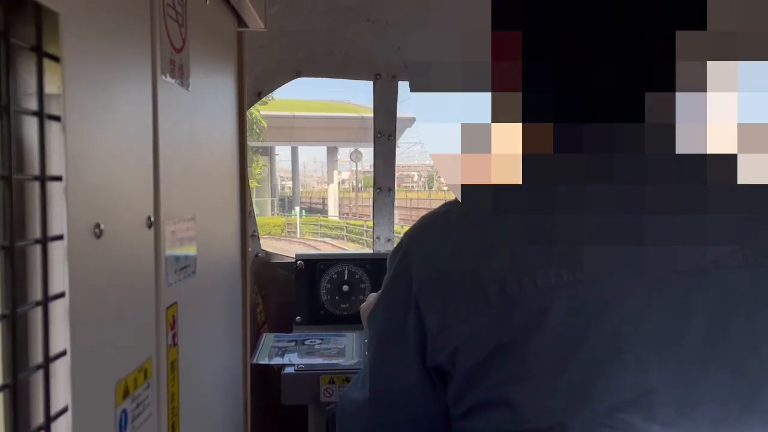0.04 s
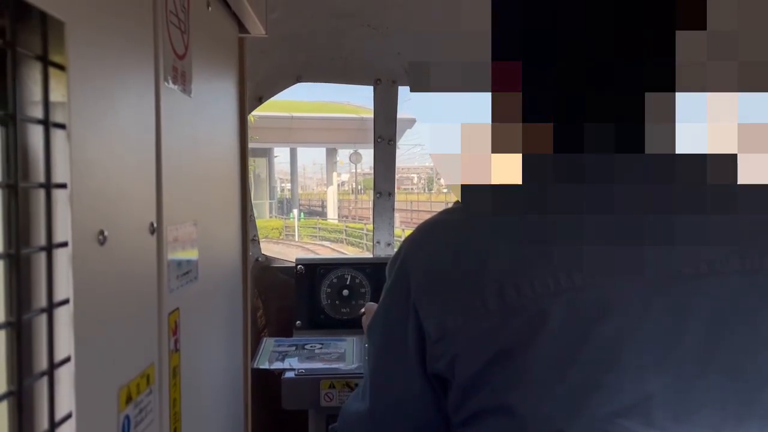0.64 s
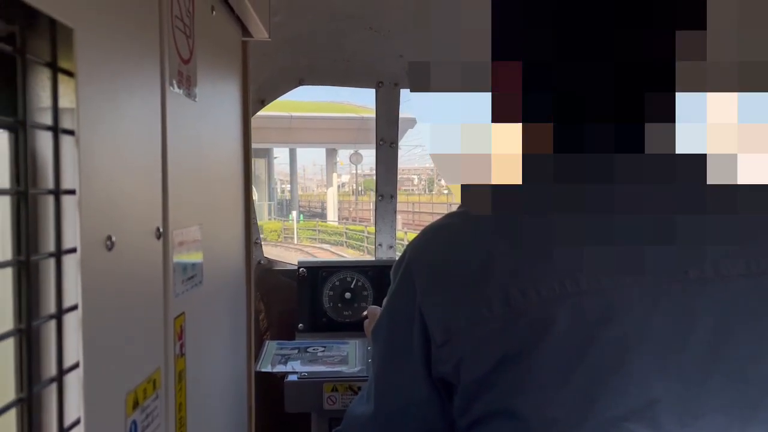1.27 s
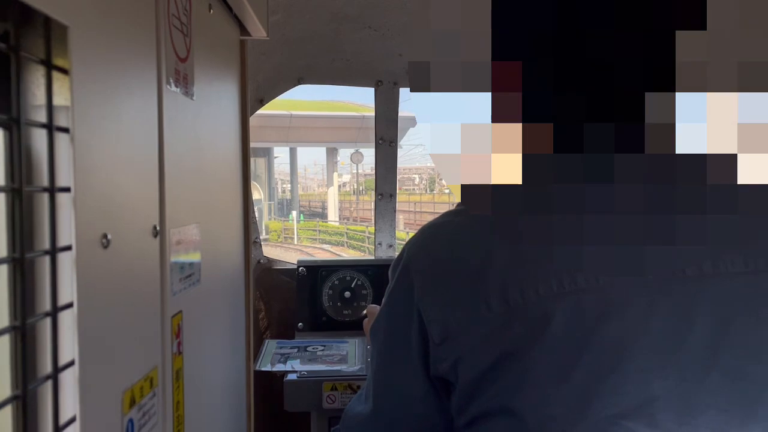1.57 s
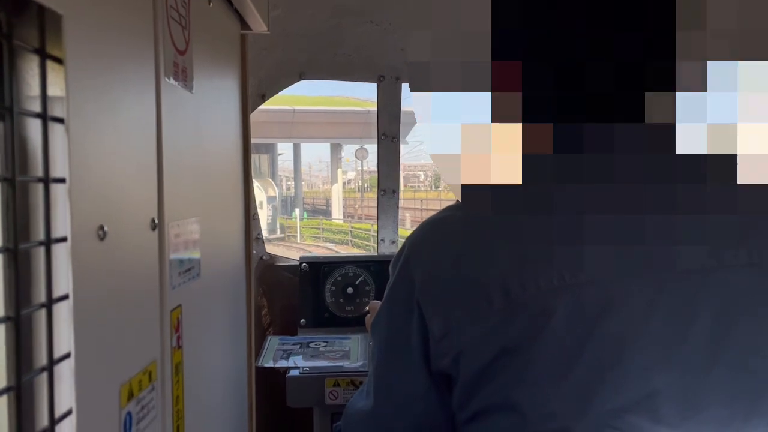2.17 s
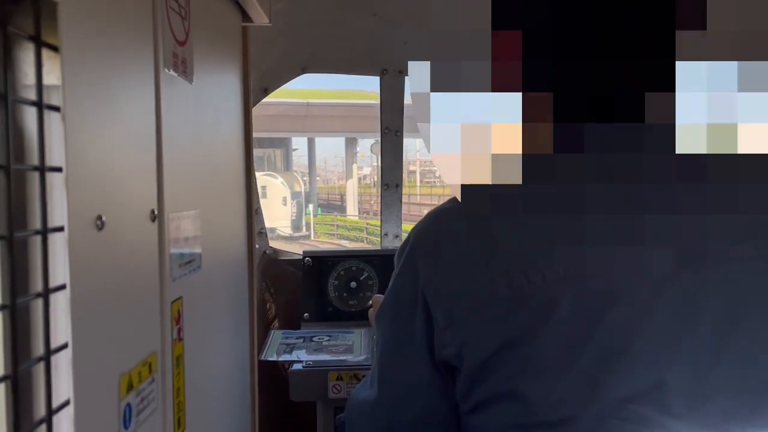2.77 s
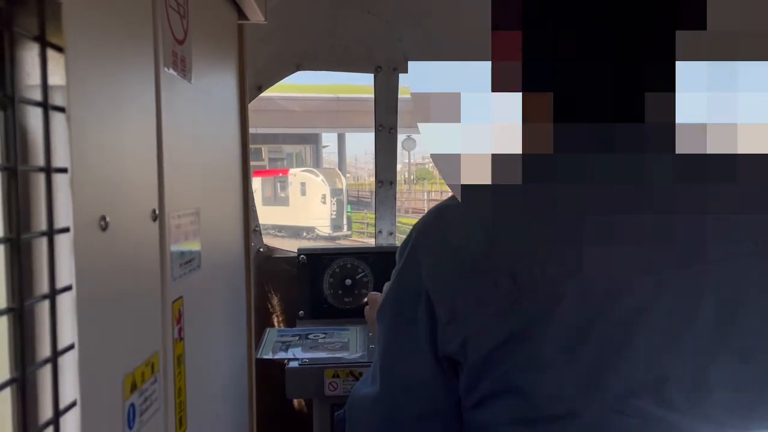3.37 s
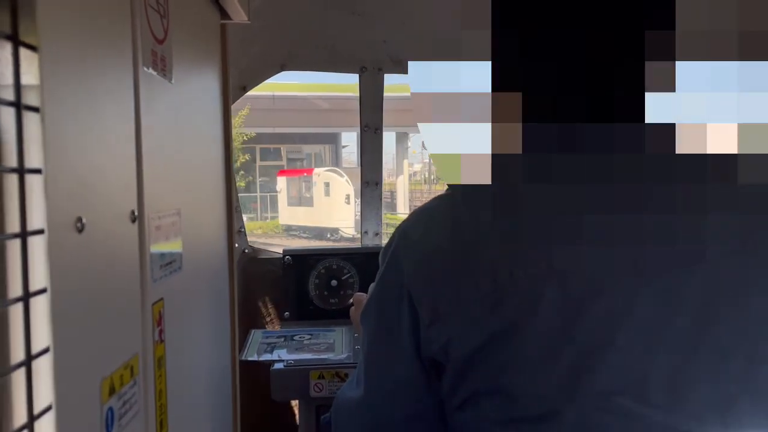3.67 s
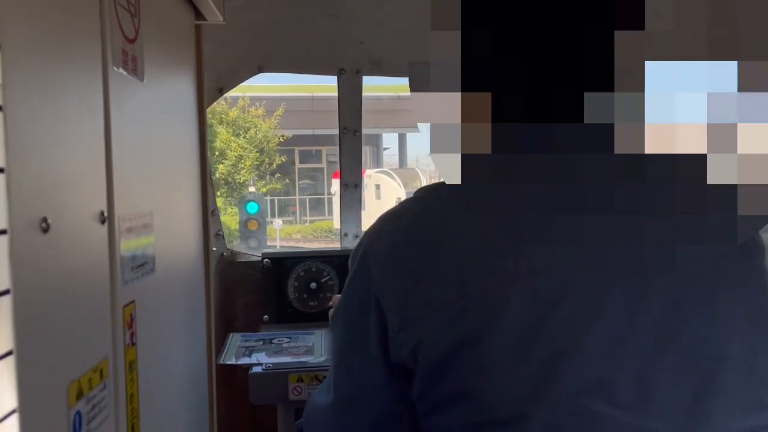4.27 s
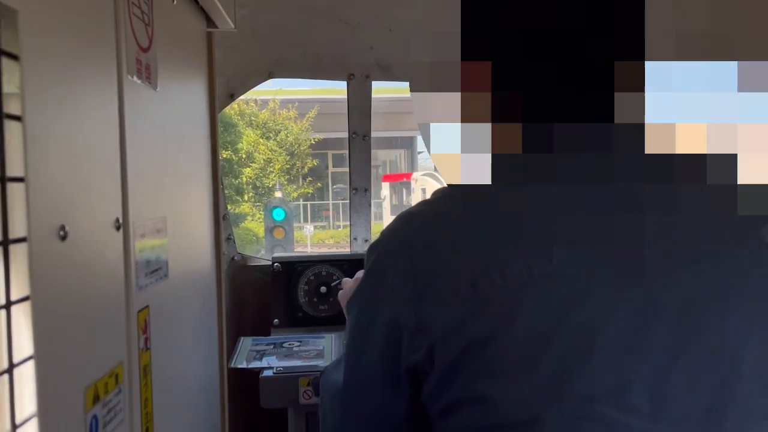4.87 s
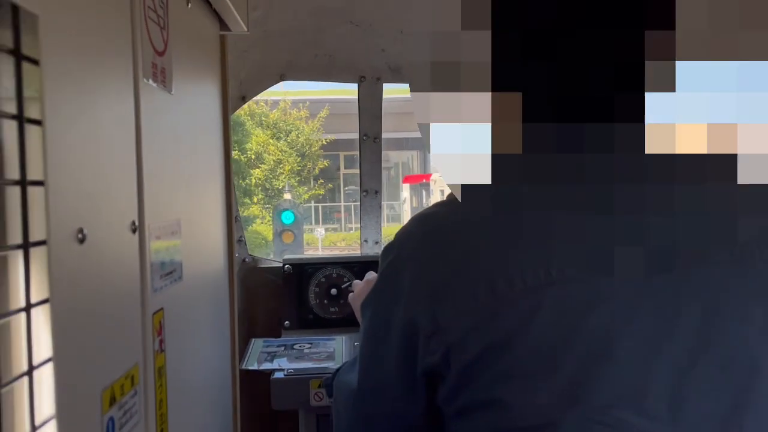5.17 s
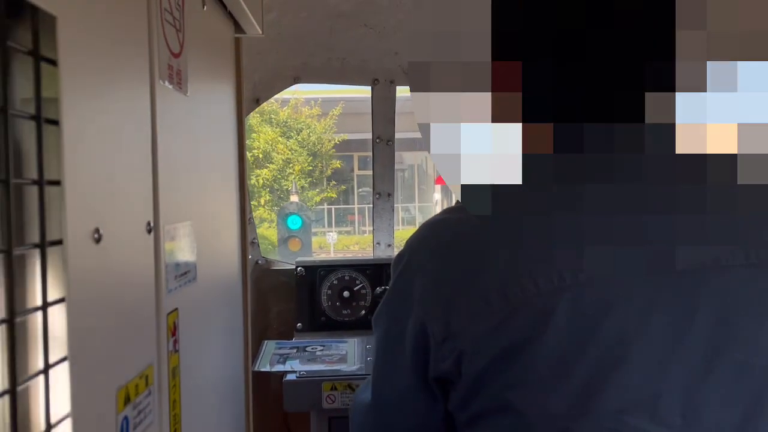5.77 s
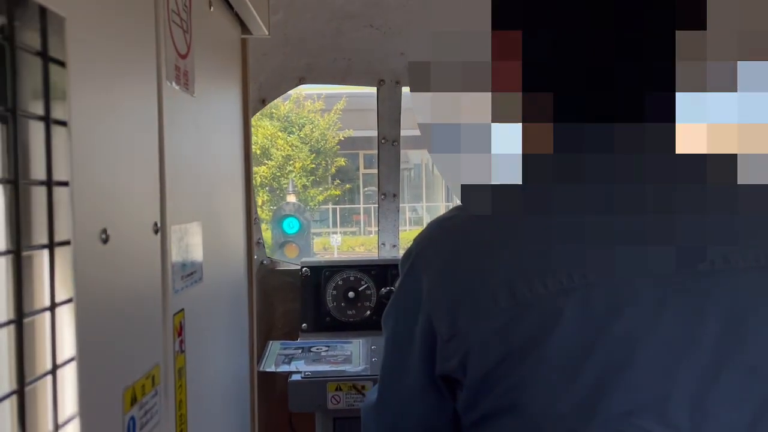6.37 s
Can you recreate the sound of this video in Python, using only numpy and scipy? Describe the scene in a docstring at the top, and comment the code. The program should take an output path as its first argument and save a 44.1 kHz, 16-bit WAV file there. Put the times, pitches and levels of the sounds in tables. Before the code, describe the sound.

Heard from within the cab of a small ride-on train, a low rumble gathers a little strength and keeps going, with rolling wheel noise and a faint steely ringing. Dull thumps and muffled rail joint clacks arrive irregularly, thickest in the middle, along with a few short wheel squeaks and ticks from loose fittings. The ride then smooths out, with one more clack and thump near the end.

```python
"""The cab of a small ride-on train booms as it rolls along its outdoor track, heard from inside.
The rails force the cab into vibration, rough treads make the wheels roar, and friction makes them sing.
Impacts at rail joints clack, jolts thump through the suspension and leave the panels shuddering.
Flanges give a few short squeaks and loose fittings tick, over a thin hiss and a faint gear whine."""
import sys
import numpy as np
from scipy import signal
from scipy.fft import rfft, irfft
from scipy.io import wavfile
from scipy.ndimage import uniform_filter1d

SR = 44100
rng = np.random.default_rng(int(sys.argv[2]) if len(sys.argv) > 2 else 0)


def dump(signal):
    """Clip the signal to [-1, 1] and save it as 16-bit WAV at the path in sys.argv[1]."""
    limited = np.clip(np.atleast_2d(signal).T, -1, 1)
    pcm = np.round(limited * 32767).astype(np.int16)
    wavfile.write(sys.argv[1], SR, pcm)


N = 283563
T, HZ = np.arange(N) / SR, np.fft.rfftfreq(N, 1 / SR)

# The train gathers way, then runs evenly. Each row: time in seconds, rolling effort in dB.
EFFORT = [(0, -6), (.45, -3), (1.0, -1.5), (1.8, -1), (2.5, 0), (3.0, -0.5), (3.45, -1.5), (4.1, 0.5),
          (4.55, -1.5), (5.4, -0.5), (6.43, -1.5)]
# Spectra of the noisy sources. Each row: frequency in Hz, relative spectral density in dB.
BOOM_SPECTRUM = [(10, -39), (24, -20), (32, -26), (38, -15), (43, 3), (50, 2), (58, -3.5), (76, -6),
                 (94, 3.5), (102, -2), (113, -0.5), (130, -15.5), (150, -14.5), (175, -8), (198, -8.5),
                 (224, -18.5), (280, -24), (400, -86)]
ROAR_SPECTRUM = [(120, -36), (240, -3.5), (400, -3.5), (560, -8.5), (680, -12.5), (900, -12.5), (1200, -14),
                 (1550, -14), (1900, -18.5), (3000, -23.5), (4500, -31), (7000, -36.5), (9000, -77.5)]
SHUDDER_SPECTRUM = [(20, -16), (45, 14), (70, 4), (110, 3.5), (150, 3.5), (200, -5.5), (280, 0.5),
                    (480, -18), (700, -23), (1500, -55)]
TICK_SPECTRUM = [(1500, -22), (4000, -.5), (5500, 1), (8500, 6.5), (11000, 0), (13500, -2), (15500, -12)]
HISS_SPECTRUM = [(1500, -10), (3000, -1), (5000, -3), (5600, -6), (6500, -4), (7200, -5), (8200, 0),
                 (9500, -5), (11000, -7), (12500, -8.3), (13100, -5.5), (14200, -9.5), (14900, -19),
                 (15600, -28)]
# Bounce, boom and drone of the cab. Each row: lower and upper edge in Hz, level in dB at 0 dB effort,
# dB gained per dB of effort, steadiness from 0 to 0.5.
BOOM_BANDS = [(15, 68, -25, 1.2, 0.27), (68.7, 143.3, -19.5, 2, 0.26), (145, 490, -28.5, 1.17, 0.32)]
# Brief dips in the boom. Each row: centre in seconds, length in seconds, gain in dB.
BOOM_DIPS = [(0.77, 0.084, -6), (1.09, 0.043, -7.5), (1.182, 0.052, -5.5), (1.73, 0.18, -2.5),
             (2.0, 0.1, -4.5), (2.275, 0.14, -5), (2.42, .08, -2), (2.616, 0.04, -4), (3.29, 0.069, -7),
             (3.467, 0.12, -4), (3.744, 0.051, -5), (3.899, 0.059, -9.5), (4.333, 0.063, -6),
             (4.587, 0.041, -0.5), (4.78, 0.048, 0), (5.33, 0.035, -3.5)]
# Resonances of wheels and panels. Each row: frequency and width in Hz, left and right lift in dB.
STEEL_RESONANCES = [(345, 50, 2.5, .5), (425, 70, 2.5, 3), (512, 55, 3, 2.5), (752, 40, 2.5, 4.5),
                    (1715, 70, 2.5, 1), (2285, 110, 1.5, 3), (2480, 110, 3, 4), (2850, 70, 5.5, 2),
                    (3015, 60, 6, 1.5), (3240, 70, 4.5, 3), (3360, 70, 3.5, 2), (3680, 80, 3, 3),
                    (4040, 80, 4.5, 3), (4235, 60, 3.5, 1), (5000, 110, 3.5, 2.5), (5290, 170, 4, 0)]
# Wheel modes. Each row: frequency and width in Hz, level in dB on the straight and in the bend.
SINGING_MODES = [(1050, 64, -50, -44.6), (1115, 60, -55, -49.5), (1355, 60, -47.7, -49.5),
                 (1430, 50, -50.8, -53), (2070, 44, -53.6, -52.6)]
# Suspension jolts. Each row: time in seconds, level in dB, rocking frequency in Hz, length in seconds.
JOLTS = [(0.978, -15.5, 52, .1), (2.566, -21.5, 194.7, 0.061), (2.589, -10.5, 84.5, .022),
         (2.594, -12, 50, 0.039), (2.84, -4.5, 93, 0.024), (3.335, -20.5, 196, 0.023),
         (3.361, -8.5, 102.3, 0.057), (3.381, -10.5, 50, 0.051), (3.555, -18, 237, .015),
         (3.57, -10.5, 191, 0.038), (3.589, -10.5, 51.3, 0.067), (3.63, -9, 104, 0.014),
         (3.815, -10, 91, .036), (3.836, -14, 55, 0.085), (3.981, -16.5, 87, 0.052), (3.994, -14, 50, .045),
         (4.039, -12, 175, 0.034), (4.045, -4, 94, 0.021), (4.105, -15.5, 90, 0.065),
         (4.727, -8, 94.6, 0.03), (4.737, -10.5, 50, .04), (5.416, -17.5, 54.4, 0.091),
         (6.194, -13.5, 91, 0.0035), (6.235, -17, 52, 0.081)]
# Modes of floor and walls. Each row: frequency in Hz, relative level in dB, 60 dB decay time in seconds.
CAB_MODES = [(46.8, -10, 0.11), (109, -9, 0.099), (120, -4, 0.16), (175, -7, 0.14), (196, -13, 0.17),
             (403, -5, 0.076)]
# Wheels striking joints. Each row: start in seconds, relative level in dB, centre in Hz,
# 60 dB decay time in seconds, fall to either side in dB per octave.
JOINT_IMPACTS = [(2.087, -30, 900, .12, 8), (2.537, -30.5, 900, .15, 8), (2.801, -32.5, 1100, .12, 6),
                 (2.828, -31.5, 1200, .11, 6), (2.829, -28, 300, .12, 14), (3.316, -31, 420, .18, 9),
                 (3.378, -33, 430, .2, 12), (3.543, -32, 1300, .07, 6), (3.553, -21.5, 270, .16, 13),
                 (3.556, -32, 1000, .13, 13), (3.594, -29.5, 440, .14, 16), (3.778, -28.5, 380, .16, 10),
                 (4.024, -30.5, 480, .16, 9), (4.068, -30, 430, .18, 10), (4.123, -38, 2200, .14, 6),
                 (4.690, -34, 1080, .2, 15), (4.752, -30.5, 570, .24, 15), (4.759, -39, 1080, .15, 16),
                 (4.805, -34, 1020, .2, 26), (6.189, -28, 840, .075, 11), (6.210, -37, 1100, .06, 24)]
# Flange rubs. Each row: start and length in seconds, first and last frequency in Hz, level in dB.
FLANGE_RUBS = [(2.347, 0.048, 860, 1010, -28.5), (3.318, 0.034, 2400, 2470, -38),
               (3.935, 0.06, 1950, 1850, -42)]
# Loose fittings. Each row: start in seconds, relative level in dB, 60 dB decay time in seconds.
FITTING_TICKS = [(3.628, -31, 0.085), (3.775, -33.5, 0.045), (3.783, -36.5, 0.11), (4.126, -39, 0.04)]
# Whine of the drive. Each row: time in seconds, level in dB.
WHINE_LEVELS = [(0, -75), (1, -53.5), (2.5, -52), (3.2, -68), (6.43, -66)]
# Stereo image. Each row: frequency in Hz, then, table by table, likeness of left and right
# from 0 to 1, phase lead of the left in radians, left minus right level in dB.
COHERENCE = [(60, .997), (130, .985), (210, .94), (300, .7), (420, .35), (650, .15), (1400, .35),
             (2100, .45), (3500, .25), (5000, .5), (7000, .4), (7700, .99), (9400, .995), (11000, .65),
             (12600, .99)]
LEFT_PHASE_LEAD = [(50, 0), (300, .15), (450, -.4), (1000, .9), (1500, -1.1), (2070, 0), (3100, 1.3),
                   (4900, .6), (5700, -1.1), (7000, -2.1), (7700, -3.1), (9400, -3.2), (12600, -6.28)]
LEFT_BALANCE = [(50, -2), (105, -2.7), (190, 0), (330, 1), (600, 0), (1080, 3), (1350, .5), (1700, 2),
                (2100, 0), (3000, 2.2), (6000, 1.8), (8000, 0)]


def cab_boom(effort_db, surge_db=1, surge_hz=5):
    """Forced vibration: the rails shake the cab; each band throbs by itself, evened by the springs."""
    shake = unit_rms(stereo_image(rng.standard_normal((2, N)), curve(BOOM_SPECTRUM)))
    out = np.zeros((2, N))
    for low_hz, high_hz, db, follow, steadiness in BOOM_BANDS:
        bandpass = signal.butter(4, [low_hz, high_hz], "bandpass", fs=SR, output="sos")
        band = signal.sosfiltfilt(bandpass, shake)
        power = smooth_twice((band ** 2).mean(0), size=3500)
        band = unit_rms(band / (power + 1e-6) ** steadiness)
        out += band * amp(db + follow * effort_db + surge_db * drift(surge_hz))
    dips_db = sum(db * bell(T - s, length) for s, length, db in BOOM_DIPS)
    return out * amp(dips_db)


def wheel_roar(effort_db, level_db=-34.5, follow=.46, ripple_db=2, grit_db=-12, grit_per_s=260):
    """Roughness excitation: treads and grit drive the steel; many cab modes ripple the spectrum."""
    grit = (rng.random(N) < grit_per_s / SR) * rng.uniform(-1.16, 1, (2, N))
    force = rng.standard_normal((2, N)) + amp(grit_db) * unit_rms(grit)
    ripple = unit_rms(smooth_twice(rng.standard_normal((2, len(HZ))), size=70))
    roar = unit_rms(stereo_image(force, curve(ROAR_SPECTRUM) + ripple_db * ripple))
    flutter_db = drift(hz=24.4)
    return roar * amp(level_db + follow * effort_db + flutter_db)


def steel_resonance(pair, swell=.3, wander=.004):
    """Resonance: the steel lifts narrow bands, which swell and shift as the load on the wheels moves."""
    hz, _, spectra = signal.stft(pair, SR, nperseg=2048, noverlap=1536)
    for centre, width, left_db, right_db in STEEL_RESONANCES:
        slow_noise = uniform_filter1d(rng.standard_normal((2, spectra.shape[2])), size=12)
        strength, shift = map(unit_rms, slow_noise)
        peak = resonance_peak(hz[:, None], centre * (1 + wander * shift), width)
        spectra = spectra * amp(np.multiply.outer([left_db, right_db], peak * (1 + swell * strength)))
    return signal.istft(spectra, SR, nperseg=2048, noverlap=1536)[1][:, :N]


def wheel_singing(bend_s=(2.0, 2.55), throb_db=2, throb_hz=22, steadiness=.3):
    """Friction excitation: rubbing sustains a few wheel modes; the lowest grow on entering a bend."""
    out, bend = np.zeros((2, N)), np.interp(T, bend_s, [0, 1])
    for hz, width, straight_db, bend_db in SINGING_MODES:
        ring = stereo_image(rng.standard_normal((2, N)), rolloff_db(HZ - hz, width / 2))
        power = uniform_filter1d((ring ** 2).mean(0), size=3000)
        ring = ring / (power + 1e-12) ** steadiness * amp(throb_db * drift(throb_hz))
        out += unit_rms(ring) * amp(straight_db + (bend_db - straight_db) * bend)
    return out


def floor_thumps(ring_db=-7, pan_db=(-1, 1)):
    """Free vibration: each jolt rocks the floor on its springs and leaves the cab modes ringing."""
    out, t = np.zeros(N), T[:SR // 2]
    response = sum(amp(db) * decay(t, t60) * np.cos(2 * np.pi * hz * t) for hz, db, t60 in CAB_MODES)
    centre_s = .1
    for s, db, hz, length in JOLTS:
        push = np.cos(2 * np.pi * hz * (t - centre_s)) * bell(t - centre_s, length)
        ring = signal.fftconvolve(push, response)[:len(t)]
        thump = push + amp(ring_db) * ring / abs(ring).max()
        add(out, s - centre_s, amp(db) * thump / abs(thump).max())
    return np.outer(amp(pan_db), out)


def panel_shudder(t60=.17, rise_s=.0065, lead_s=.01309):
    """Linear response: the panels tremble after each jolt in proportion to its strength."""
    out = np.zeros((2, N))
    for s, db, _, _ in JOLTS:
        add(out, s - lead_s, amp(db) * burst(t60, rise_s))
    return stereo_image(out, curve(SHUDDER_SPECTRUM))


def joint_clacks(rise_s=.004, lift=.8, muffle_hz=2600):
    """Impact excitation: a wheel drops over a joint and shakes the steel; the floor muffles the top."""
    out = np.zeros((2, N))
    for s, db, hz, t60, slope_db in JOINT_IMPACTS:
        blow = burst(t60, rise_s)
        octaves = np.log2((np.fft.rfftfreq(blow.shape[1], 1 / SR) + 1) / hz)
        bass_cut = 1 / (1 + np.exp(-2 * (octaves + 2)))
        colour = unit_rms(amp(-slope_db * np.hypot(octaves, .5)) * bass_cut)
        add(out, s, amp(db) * irfft(rfft(blow) * colour, blow.shape[1]))
    steel_db = sum(np.outer([left_db, right_db], resonance_peak(HZ, hz, width))
                   for hz, width, left_db, right_db in STEEL_RESONANCES)
    return stereo_image(out, lift * steel_db + rolloff_db(HZ, muffle_hz))


def flange_squeaks(slip_radians=.75, rasp_db=3, rasp_hz=200):
    """Stick-slip friction: each short rub of a flange on the rail glides in pitch, rasps and fades."""
    out = np.zeros((2, N))
    for s, length, first_hz, last_hz, db in FLANGE_RUBS:
        progress = np.arange(0, 1, 1 / (length * SR))
        glide = np.sin(np.pi / 2 * np.minimum(2 * progress, 1)) ** 2
        hz = first_hz + (last_hz - first_hz) * glide
        slip = slip_radians * drift(rasp_hz)[:len(progress)]
        envelope = np.sin(np.pi * progress ** .48) ** 2
        add(out, s, amp(db) * envelope * np.sin(2 * np.pi * np.cumsum(hz) / SR + slip))
    return out * amp(rasp_db * np.array([drift(rasp_hz), drift(rasp_hz)]))


def fitting_ticks(rise_s=.0012):
    """Contact noise: small loose metal parts knock and ring briefly in the jolted cab."""
    out = np.zeros((2, N))
    for s, db, t60 in FITTING_TICKS:
        add(out, s, amp(db) * burst(t60, rise_s))
    return stereo_image(out, curve(TICK_SPECTRUM))


def hiss(level_db=-47, flicker_db=.55, crackle_db=-8, crackle_per_s=400):
    """Broadband and shot noise: a thin flickering hiss with a fine crackle in it."""
    crackle = (rng.random(N) < crackle_per_s / SR) * rng.standard_normal((2, N))
    noise = rng.standard_normal((2, N)) + amp(crackle_db) * unit_rms(crackle)
    coloured = unit_rms(stereo_image(noise, curve(HISS_SPECTRUM)))
    return coloured * amp(level_db + flicker_db * drift(hz=22))


def gear_whine(hz=786, waver=.00597, throb_db=3.5):
    """Frequency modulation: a faint gear tone whose pitch wavers slightly at random."""
    cycles = np.cumsum(hz * (1 + waver * drift(hz=9.3))) / SR
    level_db = np.interp(T, *np.transpose(WHINE_LEVELS))
    throb = amp(throb_db * np.array([drift(hz=14), drift(hz=14)]))
    return unit_rms(np.sin(2 * np.pi * cycles) * throb) * amp(level_db)


def stereo_image(pair, colour_db):
    """Partial coherence: two independent signals are blended and coloured into left and right."""
    left, independent = rfft(pair)
    coherence = curve(COHERENCE)
    right = coherence * left + np.sqrt(1 - coherence ** 2) * independent
    right *= np.exp(-1j * curve(LEFT_PHASE_LEAD))
    balance_db = np.outer([.5, -.5], curve(LEFT_BALANCE))
    return irfft(np.array([left, right]) * amp(colour_db + balance_db), N)


def burst(t60, rise_s):
    """Modal overlap: dense vibration, heard as noise, swells quickly and dies away."""
    t = T[:SR // 2]
    envelope = (1 - np.exp(-t / rise_s)) * decay(t, t60)
    return rng.standard_normal((2, len(t))) * envelope / envelope.max()


def drift(hz):
    """Low-pass noise: a random wander of unit rms, with rates up to about hz."""
    return unit_rms(irfft(rfft(rng.standard_normal(N)) * np.exp(-(HZ / hz) ** 2), N))


def decay(t, t60):
    """Exponential damping by 60 dB in t60 seconds."""
    return np.exp(-np.log(1000) * t / t60)


def bell(t, length):
    """Gaussian pulse, length wide at 1/e of its height."""
    return np.exp(-(2 * t / length) ** 2)


def resonance_peak(hz, centre, width):
    """Gaussian spectral peak of unit height."""
    return np.exp(-2 * ((hz - centre) / width) ** 2)


def rolloff_db(hz, corner_hz):
    """Second-order roll-off, 3 dB down at the corner."""
    return -10 * np.log10(1 + (hz / corner_hz) ** 4)


def curve(points):
    """Linear interpolation on a log-frequency axis."""
    hz, value = np.transpose(points)
    return np.interp(np.log(HZ + 1), np.log(hz + 1), value)


def smooth_twice(x, size):
    """Triangular smoothing by two moving averages."""
    return uniform_filter1d(uniform_filter1d(x, size), size)


def amp(db):
    """Decibels to amplitude ratio."""
    return 10 ** (np.asarray(db) / 20)


def unit_rms(x):
    """Normalisation to an rms of one."""
    return x / np.sqrt(np.mean(x ** 2) + 1e-20)


def add(mix, s, sound):
    """Superposes a sound on the mix at s seconds."""
    part = mix[..., round(s * SR):][..., :sound.shape[-1]]
    part += sound[..., :part.shape[-1]]


def scene():
    """Superposition: boom and roar follow the rolling effort, and the other sources add to them."""
    effort_db = np.interp(T, *np.transpose(EFFORT))
    wheels = steel_resonance(wheel_roar(effort_db) + hiss()) + wheel_singing()
    running = cab_boom(effort_db) + wheels + gear_whine()
    return (running + floor_thumps() + panel_shudder() + joint_clacks()
            + fitting_ticks() + flange_squeaks())


def record(dry, ceiling=.88, cutoff_hz=15450):
    """Soft saturation rounds the highest peaks, then a low-pass filter limits the band."""
    rounded = dry / (1 + (dry / ceiling) ** 8) ** (1 / 8)
    lowpass = signal.firwin(511, cutoff_hz, window=("kaiser", 9), fs=SR)
    return signal.oaconvolve(rounded, lowpass[None], "same")


dry = scene()
out = record(dry)
dump(out)
```